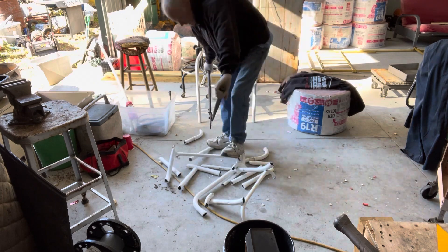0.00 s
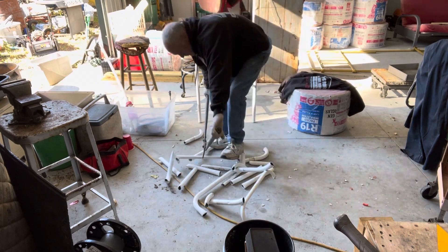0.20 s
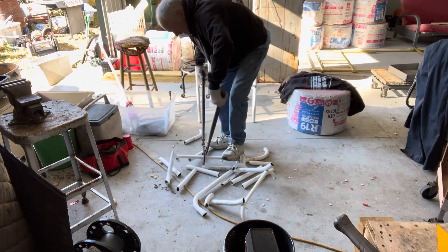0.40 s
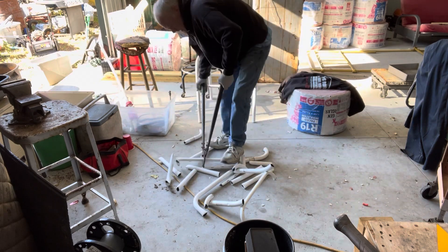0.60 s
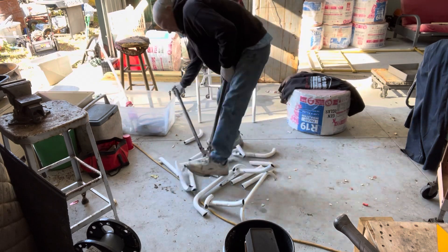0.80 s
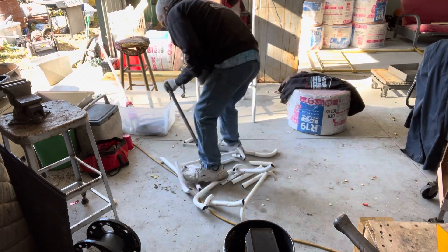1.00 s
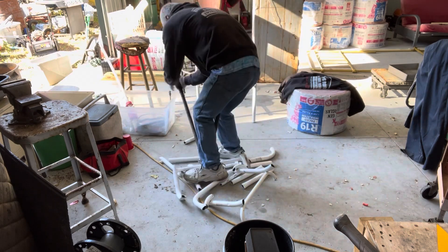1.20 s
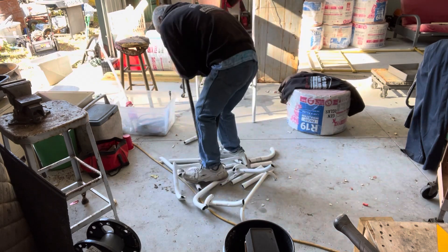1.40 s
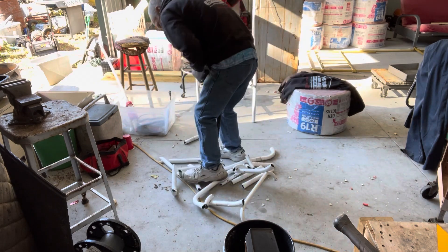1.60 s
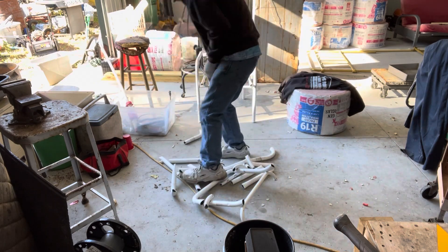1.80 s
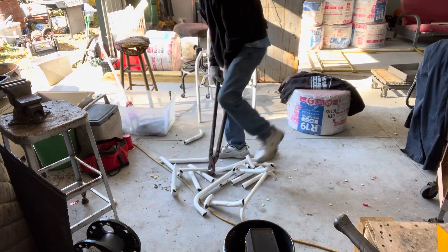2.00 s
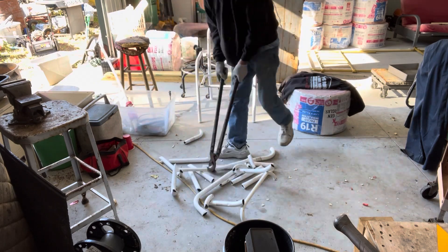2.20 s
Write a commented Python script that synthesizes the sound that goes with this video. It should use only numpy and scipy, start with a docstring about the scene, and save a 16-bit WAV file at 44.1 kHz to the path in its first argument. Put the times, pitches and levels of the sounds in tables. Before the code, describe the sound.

Hollow aluminium tubes clatter and grate across concrete, with a heavy thud and ringing bolt cutter clank

```python
"""A scrape, a small knock and a faint low ring on the left come first, then clanks, thuds and squeals.
Cut aluminium tubes lie in a heap on a garage's concrete floor: bolt cutters strike and ring, a shoe shoves
the heap along, and single tubes tip over and ring. Contacts and thuds are decaying noise, scrapes are
filtered stick-slip clicks, ringing and loose pieces are damped sines, and squeals are sustained modes.
The hard room answers each by convolution with a dense echo, over still air."""
import sys
import numpy as np
from scipy import signal
from scipy.io import wavfile

SR = 44100
rng = np.random.default_rng(int(sys.argv[2]) if len(sys.argv) > 2 else 0)


def unload_wav(signal):
    """Save mono or channel-first audio to the path in sys.argv[1] as 16-bit WAV at rate SR, clipped to [-1, 1]."""
    wavfile.write(
        sys.argv[1],
        SR,
        np.round(np.clip(np.atleast_2d(signal).T, -1, 1) * 32767).astype(np.int16),
    )


N = 99225
TIME = np.arange(N) / SR
# bands of about half an octave: edges and centres, f/Hz
EDGES = np.append(np.geomspace(45, 14400, 19), 16300)
CENTRES = np.sqrt(EDGES[1:] * EDGES[:-1])

# Balances are left over right: positive leans left.
# how hard the heap grinds over the concrete: [t/s, level/dB]
DRAG = [(0, -33), (.13, -84), (.2, -59), (.22, -33), (.39, -45), (.45, -33.5), (.52, -42.5), (.6, -74),
        (.65, -45), (.68, -40.5), (.74, -31.5), (.785, -28.5), (.85, -37.5), (.95, -41), (1.0, -34),
        (1.04, -28.5), (1.08, -34), (1.15, -37.5), (1.25, -49), (1.33, -55.5), (1.525, -44.5), (1.545, -26),
        (1.585, -24), (1.63, -31.5), (1.72, -48), (1.85, -55.5), (2.16, -59.5), (2.22, -40), (2.25, -53)]
# colour of the grinding: [f/Hz, level/dB per half octave, before DRAG and GRIT_DB]
GRIND_COLOUR = [(80, -59), (300, -36), (700, -20), (1100, -14.5), (1700, -8.5), (3000, -11), (4800, -9),
                (8500, -12.5), (12000, -7), (16000, -18)]
# shoes scuffing on the floor: [t/s, level/dB]
SCUFF = [(0, -48), (.17, -70), (.25, -32), (.37, -85), (.44, -35.5), (.6, -54.5), (.72, -43), (.87, -39.5),
         (.95, -47.5), (1.02, -37), (1.09, -39.5), (1.2, -51), (1.33, -56.5), (1.48, -46), (1.55, -52),
         (1.63, -39), (1.72, -50.5), (1.95, -52.5), (2.05, -45), (2.25, -57.5)]
# colour of the scuffing: [f/Hz, level/dB per half octave, before SCUFF]
SCUFF_COLOUR = [(50, -56), (130, -25.5), (260, -20), (550, -21.5), (900, -8), (1600, -53), (4000, -55)]
# still air of the garage: [f/Hz, level/dB per half octave]
AIR = [(30, -100), (55, -81), (80, -85), (140, -69), (250, -71.5), (700, -86), (2000, -98), (8000, -105),
       (16000, -100)]
# hard contacts of metal and concrete, before colour:
# [t/s, body level/dB, middle level/dB, treble level/dB, t60/s]
CLACKS = [(.001, -45.5, -35, -44.5, 0.016), (0.2096, -35.5, -20, -22, 0.059),
          (0.2443, -42, -23, -32, 0.041), (0.274, -32.5, -23, -24, 0.061), (0.284, -35, -30, -14.5, 0.043),
          (0.343, -48.5, -39, -20.5, 0.074), (0.427, -41.5, -35, -38, 0.11),
          (0.612, -75, -89, -39.5, 0.039), (0.625, -48.5, -38, -48, 0.025), (0.659, -53.5, -50, -40, 0.16),
          (0.673, -76, -30.5, -40, 0.035), (0.982, -62, -27.5, -34, 0.17), (1.052, -45, -32, -26, 0.098),
          (1.069, -51, -22.5, -16, 0.021), (1.103, -53, -28.5, -21.5, 0.027), (1.215, -56, -42, -31, 0.06),
          (1.464, -49.5, -45.5, -34.5, 0.066), (1.535, -23, -26, -32, 0.054),
          (1.604, -46, -29.5, -21, 0.023), (1.8774, -74, -27, -18, 0.081), (2.015, -52.5, -41, -49, 0.17),
          (2.1837, -76, -40, -37, 0.047)]
# where body, middle and treble are read: [f/Hz]
CLACK_ZONES_HZ = [400, 1600, 9000]
# colour shared by all contacts: [f/Hz, level/dB]
CLACK_COLOUR = [(50, -92), (130, -35), (260, -16), (550, 2.5), (950, -5.5), (1600, 1), (3000, -7),
                (6000, -2), (12500, -4), (16000, -29)]
# slips that make one mode sing out:
# [t/s, f/Hz, level/dB, swell/s, hold/s, t60/s, pitch jitter/Hz, balance/dB]
SQUEALS = [(.001, 861, -43, 0.00083, 0.009, 0.52, 7, 11), (0.693, 1620, -38.5, 0.021, 0.015, .15, 69, 1),
           (0.746, 4570, -32.5, 0.023, .02, .12, 70, 8), (0.758, 4930, -29.5, .025, .01, .12, 153, 5),
           (0.763, 1915, -31.5, 0.044, 0.05, 0.15, 12.7, -1),
           (0.811, 5780, -37.5, .025, 0.022, 0.12, 27, 6), (.904, 2252, -28.5, 0.0097, 0.01, .16, 78, -5),
           (1.098, 3636, -37, 0.021, 0.11, 0.35, 70, 2), (1.562, 4556, -27, 0.011, 0, .06, 40, -1),
           (1.631, 1005, -32, .025, 0.018, 0.1, 4.1, 5)]
# dull blows of shoe and heap on the floor: [t/s, level/dB, centre f/Hz, t60/s]
THUDS = [(0.282, -31, 255, 0.033), (0.892, -31, 305, 0.017), (.988, -34.5, 215, 0.034),
         (1.075, -33.5, 226, 0.039), (1.474, -38, 215, 0.096), (1.5306, -34.5, 298, 0.016),
         (1.5313, -13.5, 570, 0.023), (1.539, -39.5, 145, 0.12)]
# modes of the pieces that ring; CUTTERS are probably the bolt cutters:
# [hz: f/Hz, db: level/dB, t60: t60/s, pan_db: balance/dB]
SHORT_TUBE = dict( hz=[3674, 4617, 5650, 6842, 8138, 8568, 9215, 13295],
              db=[-28.5, -14.5, -19.5, -33, -16, -20.5, -17.5, -22],
              t60=[0.37, 0.07, 0.11, 0.33, 0.05, 0.085, 0.077, 0.074],
              pan_db=[-1.5, 5, 0, 7, -9, 8, -10, -19])
CUTTERS = dict( hz=[525, 830, 1589, 1861, 2714, 3671, 4038, 5415, 6062, 6245, 6816, 7151, 8524, 9964, 10928, 12180],
           db=[-38.5, -36, -23.5, -11, -27, -22.5, -18.5, -32, -35, -28, -35, -28.5, -23, -40, -23.5, -19],
           t60=[0.23, 0.26, 0.2, 0.25, 0.46, 0.32, 0.32, 0.35, 0.39, 0.34, 0.36, 0.25, .22, .24, .17, 0.13],
           pan_db=[-4, -6.5, 4, -1, 1, -2.5, 10.5, 18, 1, 3, -11, -2, -2, 13, -5, -3])
NUDGED_TUBE = dict( hz=[1571, 3687, 4604, 5045, 5637, 6141, 6840, 7077, 8741, 9187],
               db=[-35, -28, -38, -29, -33, -41, -38, -36.5, -34.5, -38],
               t60=[0.37, 0.4, 0.31, 0.17, 0.27, 0.26, 0.3, 0.27, 0.17, 0.23],
               pan_db=[-3, 0, -7, 5, 8, -3, 6, 5, -4, 10])
HEAP = dict( hz=[877, 1930, 3640, 3760, 5619, 5885, 6298, 9065],
        db=[-34.5, -32, -30.5, -26, -25.5, -31, -30, -27.5],
        t60=[0.23, 0.7, 0.51, 0.21, 0.096, 0.23, .38, .24], pan_db=[2, 1, 7, 4, -6, 10, -1, 0])
BENT_TUBE = dict( hz=[1559, 2716, 3040, 3690, 4153, 4500, 5132, 5378, 6255, 6519],
             db=[-20, -18, -15, -29, -27, -41, -14.5, -28, -20, -32],
             t60=[0.41, 0.19, 0.35, 0.45, 0.45, 0.31, 0.18, .3, 0.23, 0.37],
             pan_db=[2.5, 5, -1, 3, 5, -7, -1.5, 7, 0.5, 0])
SLIDING_TUBE = dict( hz=[1865, 3000, 3446, 7647, 8262, 9207], db=[-26.5, -23.5, -26, -25, -28.5, -27],
                t60=[0.15, 0.24, 0.25, 0.12, 0.15, 0.22], pan_db=[-4, 9, 10, -4, 2, -6])
TAPPED_TUBE = dict( hz=[1760, 3670, 3780, 9245], db=[-47, -25, -38, -55], t60=[0.33, 0.13, .17, .16],
               pan_db=[2, 3.5, 3, 1.4])
# blows that set each piece ringing: [t/s, level/dB]
SHORT_BLOWS = [(.2875, 3)]
CUTTER_BLOWS = [(.3396, -15.5), (1.879, 0)]
NUDGED_BLOWS = [(.341, -3), (.432, -5.5)]
HEAP_BLOWS = [(.985, -26), (1.0697, -0.5), (1.214, -11.5)]
BENT_BLOWS = [(1.398, -33), (1.6057, -1.5)]
SLIDING_BLOWS = [(1.539, 0), (1.577, 1.5)]
TAPPED_BLOWS = [(2.1852, 0)]
# decay of the garage's echo: [f/Hz, t60/s]
ROOM_T60 = [(100, 0.24), (600, 0.28), (2500, 0.27), (7000, 0.42), (15000, 0.16)]
# left-right likeness of diffuse sound: [f/Hz, correlation]
ROOM_LIKENESS = [(100, 0.69), (400, 0.54), (1000, 0.057), (2500, 0.08), (10000, 0.017)]
# leaning of the contact noise: [f/Hz, balance/dB]
LEANING = [(200, -1), (800, -1), (4500, 2), (9000, -2), (14000, 0)]
# width of the direct noise: [f/Hz, side over middle level/dB]
WIDTH = [(300, -25), (1500, -12), (5000, 5), (12000, -9)]

SLIPS_PER_S, SLIP_SPREAD_DB, GRIT_DB = 800, 2.5, -5.5
# the slipping contact makes the grinding come in patches and a singing mode flutter
GRIND_PATCH_DB, GRIND_PATCH_HZ = 3, 69.5
SQUEAL_WAVER_HZ, SQUEAL_FLUTTER_DB = 221.2, 3
# loose pieces rattle under the drag and after each hard contact
RATTLES_PER_S, RATTLE_DB, RATTLE_T60_S, RATTLE_SPREAD_DB = 240, -3, .1, 11.5
CLACK_RING_DB, RATTLE_PAN_DB = -15, 6.5
THUD_SKIRT_DB_PER_OCT = 19
# each ringing mode wavers unevenly as its reflections interfere, made here with close neighbouring sines
NEIGHBOUR_DB, NEIGHBOUR_OFFSET_HZ, NEIGHBOUR_BUILD_S = -2.5, 39.3, 0.0092
PHASE_SPREAD_RAD = 1.043
ROOM_DELAY_S, CLACK_ROOM_DB, GRIND_ROOM_DB, RING_ROOM_DB = 0.00041, -7.5, 0.5, -9.5
CUTOFF_HZ = 15800


def from_db(db):
    """Logarithmic level: 20 dB is a factor of ten in amplitude."""
    return 10 ** (np.asarray(db) / 20)


def at_hz(points, hz):
    """Logarithmic frequency axis: a spectrum is read linearly in log f."""
    f, value = np.transpose(points)
    return np.interp(np.log(hz), np.log(f), value)


def gain_curve(points):
    """Amplitude modulation: a dB curve becomes a gain for every sample."""
    return from_db(np.interp(TIME, *np.transpose(points)))


def pan(db):
    """Constant power: left and right gains share the same total power at any balance."""
    gains = from_db(np.array([[db], [-db]]) / 2)
    return gains / np.sqrt(np.mean(gains ** 2))


def decay(start, t60):
    """Exponential damping: silence, then a fall from 1 by 60 dB in t60."""
    elapsed = np.maximum(TIME - start, 0)
    return (TIME >= start) * np.exp(-np.log(1000) * elapsed / max(t60, 1e-3))


def wander(rate):
    """Random modulation: Gaussian values of spread 1, rate of them a second, joined by lines."""
    values = rng.standard_normal(2048)
    return np.interp(TIME * rate, np.arange(len(values)), values)


def band(x, k):
    """Band-pass filtering: white noise of rms 1 keeps its rms in band k."""
    sos = signal.butter(2, EDGES[k:k + 2], "band", fs=SR, output="sos")
    return signal.sosfilt(sos, x + 1e-18) * np.sqrt(SR / 2 / (EDGES[k + 1] - EDGES[k]))


def contact_noise(envelope_at):
    """Middle-side mixing: noise under a frequency-dependent envelope, its width set band by band."""
    out = 0
    for k, hz in enumerate(CENTRES):
        mid, side = band(rng.standard_normal((2, N)) * envelope_at(hz), k)
        width = from_db(at_hz(WIDTH, hz))
        stereo = (mid + width * side * [[1], [-1]]) / np.hypot(1, width)
        out = out + stereo * pan(at_hz(LEANING, hz))
    return out


def slips():
    """Stick-slip friction: tiny random clicks of uneven size and either sign, rms 1."""
    sizes = from_db(SLIP_SPREAD_DB * np.minimum(rng.exponential(1, N), 4))
    signed_sizes = sizes * rng.choice([-1, 1], N)
    clicks = signed_sizes * (rng.random(N) < SLIPS_PER_S / SR)
    return clicks / np.std(clicks)


def grinding():
    """Stick-slip on grit: tubes scrape the concrete, and each band strengthens in its own patches."""
    clicks = from_db(GRIT_DB) * slips() * gain_curve(DRAG)

    def envelope_at(hz):
        patches_db = GRIND_PATCH_DB * wander(GRIND_PATCH_HZ)
        return clicks * from_db(at_hz(GRIND_COLOUR, hz) + patches_db)
    return contact_noise(envelope_at)


def scuffing():
    """Stick-slip through broad resonances: the shoes' slips are coloured by what rubs."""
    clicks = slips() * gain_curve(SCUFF)
    return contact_noise(lambda hz: clicks * from_db(at_hz(SCUFF_COLOUR, hz)))


def diffuse(k):
    """Diffuse field: a band of noise whose left-right correlation is set by the room."""
    alike = np.clip(at_hz(ROOM_LIKENESS, CENTRES[k]), -1, 1)
    mid, side = band(rng.standard_normal((2, N)), k)
    return np.sqrt((1 + alike) / 2) * mid + np.sqrt((1 - alike) / 2) * side * [[1], [-1]]


def still_air():
    """Stationary diffuse noise: a steady, very faint background."""
    return sum(diffuse(k) * from_db(at_hz(AIR, hz)) for k, hz in enumerate(CENTRES))


def clack_level(contact, hz):
    """Source spectrum: a contact's three zone levels, joined over log f, plus the shared colour, in dB."""
    return np.interp(np.log(hz), np.log(CLACK_ZONES_HZ), contact[1:4]) + at_hz(CLACK_COLOUR, hz)


def clacks():
    """Modal crowding: many quickly damped modes merge into a crack of decaying noise."""
    powers = np.array([decay(s, t60) ** 2 for s, *_, t60 in CLACKS])

    def envelope_at(hz):
        levels_db = [clack_level(contact, hz) for contact in CLACKS]
        return np.sqrt(from_db(levels_db) ** 2 @ powers)  # powers of overlapping contacts add
    return contact_noise(envelope_at)


def tinkles(times, level_at):
    """Damped oscillation: short rings of loose pieces, each of random pitch, size and direction."""
    out, t = np.zeros((2, N + SR)), TIME[:SR // 4]
    fade = from_db(-60 * t / RATTLE_T60_S)
    draws = rng.uniform(-1, 1, (len(times), 5))
    for i, (s, (pitch, size, side, *phases)) in enumerate(zip(times, draws)):
        hz = np.interp(pitch, [-1, 0, 1], [900, 4500, 12300])
        wave = np.sin(2 * np.pi * hz * t + np.pi * np.array(phases)[:, None])
        gain = from_db(level_at(i, hz) + RATTLE_SPREAD_DB * size)
        start = int(max(s, 0) * SR)
        out[:, start:start + len(t)] += gain * pan(RATTLE_PAN_DB * side) * fade * wave
    return out[:, :N]


def rattles(count):
    """Secondary impacts: each contact shakes count loose modes, and dragged tubes nudge each other."""
    def drag_level(i, hz):
        return np.interp(times[i], *np.transpose(DRAG)) + at_hz(GRIND_COLOUR, hz) + RATTLE_DB

    def shaken_level(i, hz):
        return clack_level(CLACKS[i // count], hz) + CLACK_RING_DB
    times = rng.random(int(RATTLES_PER_S * N / SR)) * N / SR
    contact_times = np.repeat([contact[0] for contact in CLACKS], count)
    return tinkles(times, drag_level) + tinkles(contact_times, shaken_level)


def squeals():
    """Friction-driven mode: it swells, holds with rough level and pitch, and rings out."""
    out = 0
    for s, hz, db, swell, hold, t60, jitter_hz, pan_db in SQUEALS:
        release = s + swell + hold
        rise = np.clip((TIME - s) / max(swell, 1e-3), 0, 1)
        envelope = rise * np.where(TIME < release, 1, decay(release, t60))
        phase = 2 * np.pi * np.cumsum(hz + jitter_hz * wander(SQUEAL_WAVER_HZ)) / SR
        flutter = from_db(db + SQUEAL_FLUTTER_DB * wander(SQUEAL_WAVER_HZ))
        out = out + pan(pan_db) * flutter * envelope * np.sin(phase)
    return out


def thuds():
    """Broad low resonance: soft, heavy blows are decaying noise that falls off on both sides of a centre."""
    _, db, centre, _ = np.transpose(THUDS)
    shapes = np.array([decay(s, t60) for s, _, _, t60 in THUDS])

    def envelope_at(hz):
        octaves_away = np.abs(np.log2(hz / centre))
        return from_db(db - THUD_SKIRT_DB_PER_OCT * octaves_away) @ shapes
    return contact_noise(envelope_at)


def mode(hz, pan_db, count=3):
    """Beating: a sine and randomly placed close neighbours waver unevenly, differently on each side."""
    side_phase = PHASE_SPREAD_RAD * rng.uniform(-1.17, 1) * np.array([[1], [-1]])
    phase = rng.uniform(0, 2 * np.pi) + side_phase
    neighbours = 0
    for offset, *phases in rng.uniform(-1.002, 1, (count, 3)):
        near_hz = hz + NEIGHBOUR_OFFSET_HZ * offset
        neighbours = neighbours + np.sin(2 * np.pi * near_hz * TIME + np.pi * np.array(phases)[:, None])
    build = np.clip(TIME / max(NEIGHBOUR_BUILD_S, 1e-3), 0, 1)
    near_gain = from_db(NEIGHBOUR_DB) / np.sqrt(count) * build  # NEIGHBOUR_DB is for all together
    return pan(pan_db) * (np.sin(2 * np.pi * hz * TIME + phase) + near_gain * neighbours)


def ringing(modes):
    """Modal superposition: the damped modes of one piece add up after a unit blow."""
    return sum(from_db(db) * decay(0, t60) * mode(hz, pan_db)
               for hz, db, t60, pan_db in zip(*modes.values()))


def struck(modes, blows):
    """Linear superposition: every blow adds a scaled, delayed copy of the piece's ringing."""
    out, ring = np.zeros((2, N)), ringing(modes)
    for s, db in blows:
        start = int(max(s, 0) * SR)
        out[:, start:] += from_db(db) * ring[:, :N - start]
    return out


def ringing_pieces():
    """Modal synthesis: tubes, heap and cutters each ring in their own set of modes."""
    return (struck(SHORT_TUBE, SHORT_BLOWS) + struck(CUTTERS, CUTTER_BLOWS)
            + struck(NUDGED_TUBE, NUDGED_BLOWS) + struck(HEAP, HEAP_BLOWS)
            + struck(BENT_TUBE, BENT_BLOWS) + struck(SLIDING_TUBE, SLIDING_BLOWS)
            + struck(TAPPED_TUBE, TAPPED_BLOWS))


def garage_response():
    """Frequency-dependent reverberation: dense decaying noise, scaled to unit energy per side on average."""
    tail = 0
    for k, hz in enumerate(CENTRES):
        flat_noise = diffuse(k) * np.sqrt(EDGES[k + 1] - EDGES[k])  # equal power per hertz
        tail = tail + flat_noise * decay(ROOM_DELAY_S, at_hz(ROOM_T60, hz))
    return tail / np.sqrt(np.sum(tail ** 2) / 2)


def convolve(x, response):
    """Linear time-invariance: the room's answer is the source convolved with its response."""
    return signal.fftconvolve(np.atleast_2d(x), response, axes=1)[:, :N]


def scene():
    """Direct and reverberant sound: scrapes, contacts and ringing metal with their echo, over still air."""
    scrapes = grinding() + scuffing() + rattles(count=24)
    knocks = clacks() + thuds()
    tones = squeals() + ringing_pieces()
    room_feed = (from_db(GRIND_ROOM_DB) * scrapes + from_db(CLACK_ROOM_DB) * knocks
                 + from_db(RING_ROOM_DB) * tones)
    echo = convolve(room_feed, garage_response())
    return scrapes + knocks + tones + echo + still_air()


def record(dry):
    """Saturation and band limiting: the highest peaks are rounded; deep bass and the top are cut."""
    rounded = np.tanh(dry)
    thinned = signal.sosfilt(signal.butter(2, 55, "high", fs=SR, output="sos"), rounded)
    return signal.sosfilt(signal.ellip(10, .1, 80, CUTOFF_HZ, fs=SR, output="sos"), thinned)


dry = scene()
out = record(dry)
unload_wav(out)
```